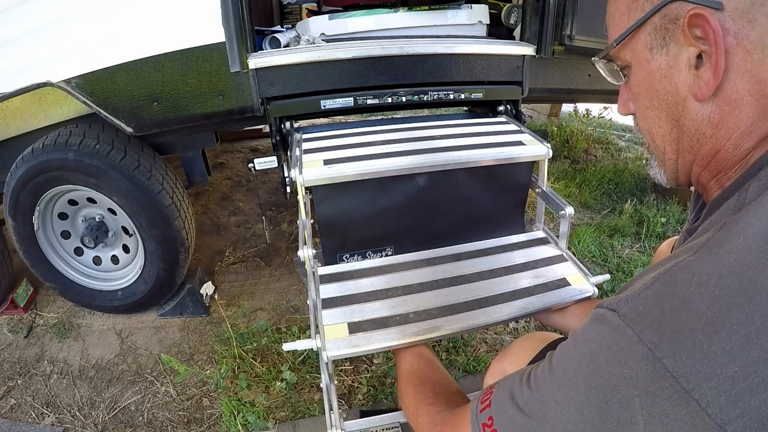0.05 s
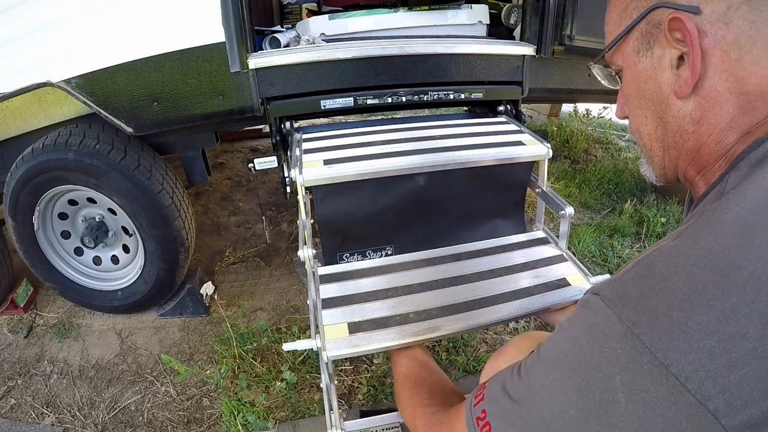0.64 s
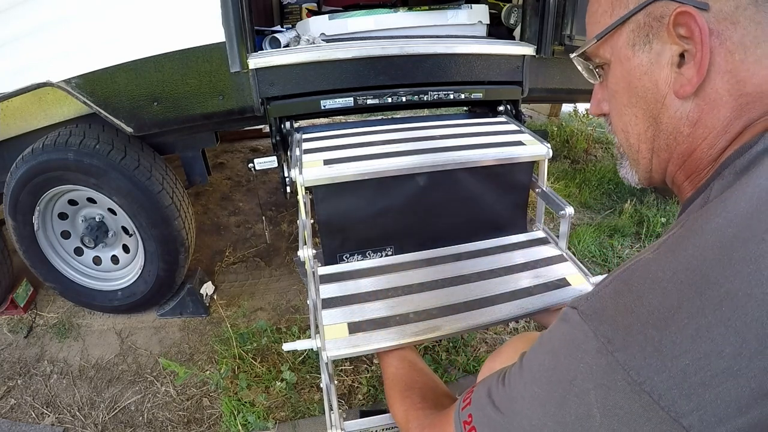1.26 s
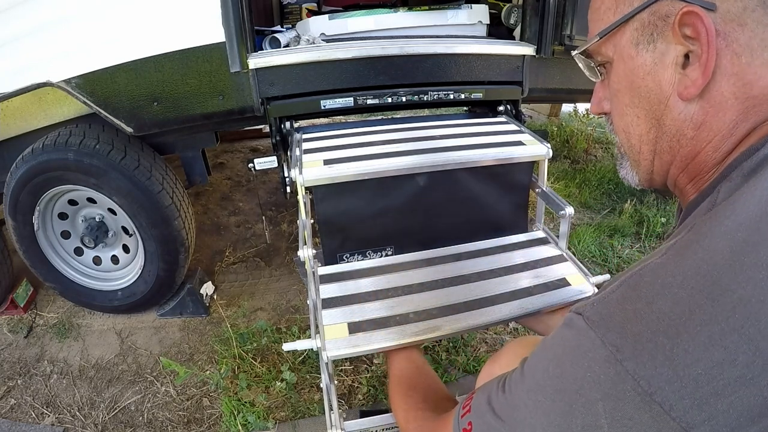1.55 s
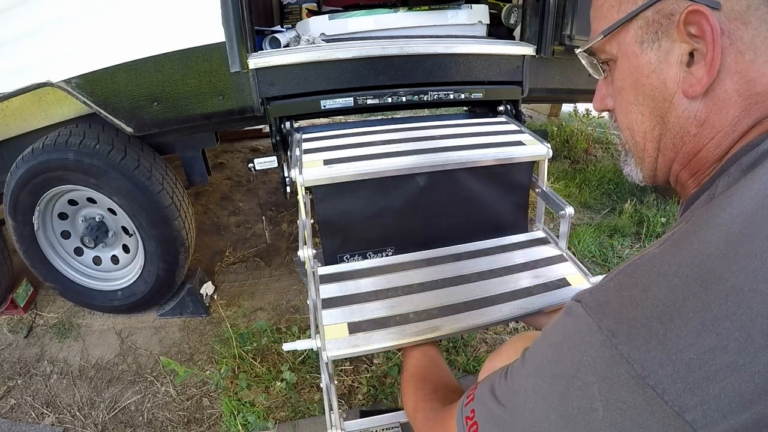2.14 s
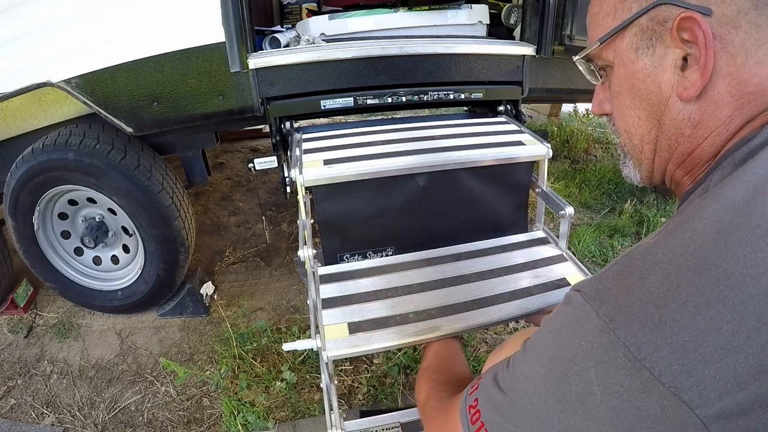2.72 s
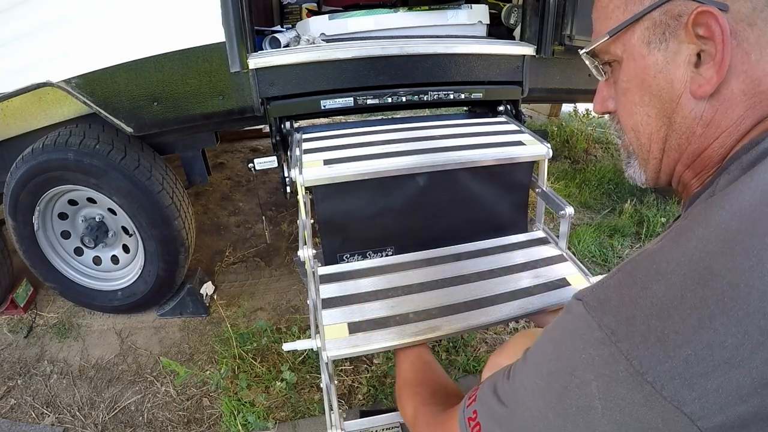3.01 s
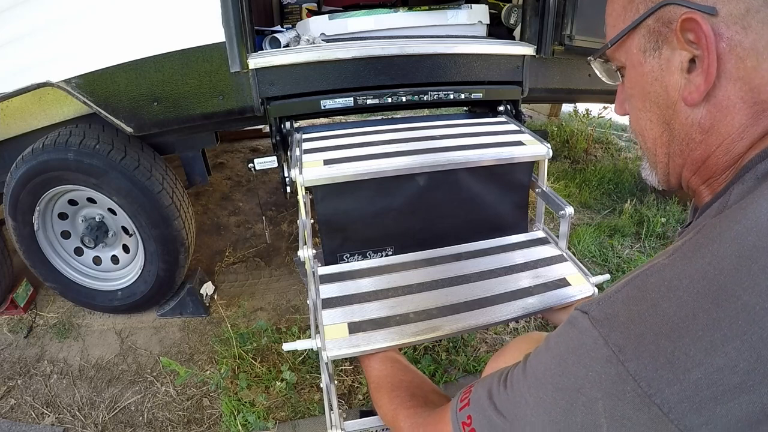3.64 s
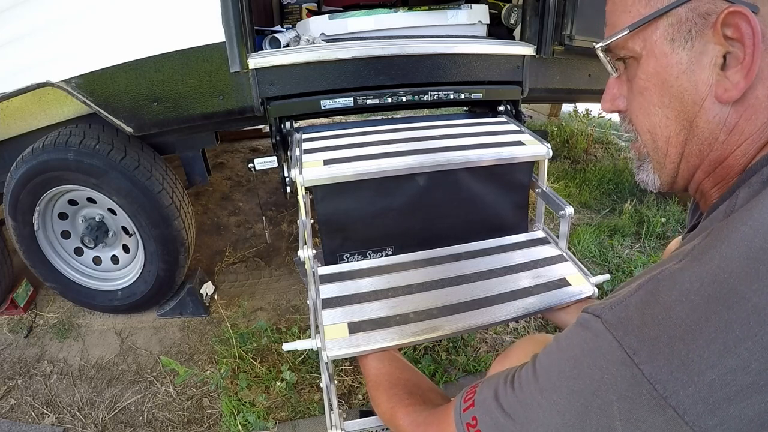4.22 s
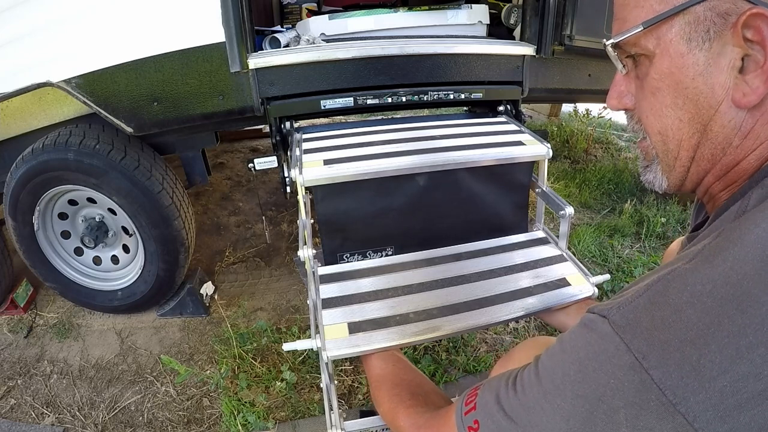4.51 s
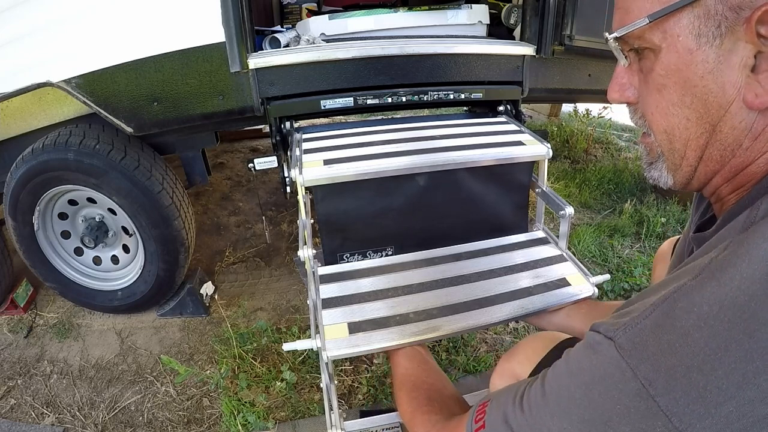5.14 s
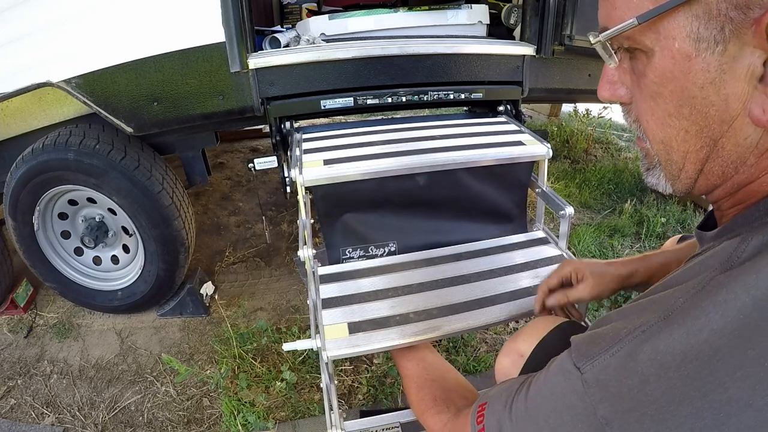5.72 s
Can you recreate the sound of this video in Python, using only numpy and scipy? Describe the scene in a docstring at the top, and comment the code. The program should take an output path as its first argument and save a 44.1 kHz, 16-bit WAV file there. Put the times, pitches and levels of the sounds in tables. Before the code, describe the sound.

Outdoors, hands press a hook-and-loop fabric panel onto a metal step close to the microphone. The fabric slides and rustles faintly, with soft finger taps, scuffs and tiny scratchy ticks. The step knocks once, lightly, about a second in. A low hum from a distant engine then swells, holds for a few seconds and drops back, over a soft rumble of air.

```python
"""Outdoors at an aluminium trailer step, hands press a hook-and-loop backed fabric panel into place. Stick-slip
friction sounds as fabric slides over the tread and fingers scuff the panel and scratch over the ribbed tread.
Impacts excite damped vibrations: fingers tap the taut panel, single hooks tick, the step knocks once. Behind
them the air hisses over a low rumble, and a far engine hums, swells and fades while its firing rate sinks."""
import sys
import numpy as np
from scipy import signal
from scipy.fft import rfft, irfft
from scipy.io import wavfile

SR = 44100
rng = np.random.default_rng(int(sys.argv[2]) if len(sys.argv) > 2 else 0)


def inscribe(sig):
    """Save sig as 16-bit PCM at rate SR to the path in sys.argv[1].

    A 1-D sig is mono; a 2-D sig holds one channel per row.
    Samples are clipped to [-1, 1] before scaling.
    """
    pcm = np.round(np.clip(np.atleast_2d(sig).T, -1, 1) * 32767)
    wavfile.write(sys.argv[1], SR, pcm.astype(np.int16))


N = 262836


def from_db(db):
    """Amplitude ratio: tenfold for every 20 dB."""
    return 10 ** (np.asarray(db) / 20)


def unit_rms(x):
    """Normalisation to unit mean power."""
    return x / np.sqrt(np.mean(x ** 2) + 1e-20)


def level_curve(rows):
    """Linear interpolation of a level over time, one value a sample."""
    return np.interp(np.arange(N) / SR, *np.transpose(rows))


def coloured(x, spectrum):
    """Spectral shaping along a logarithmic frequency axis; rms 1."""
    hz, db = np.transpose(spectrum)
    bins = np.maximum(np.fft.rfftfreq(N, 1 / SR), 1)
    gain = from_db(np.interp(np.log(bins), np.log(hz), db, left=-90, right=-90))
    return unit_rms(irfft(rfft(x) * gain, N))


def band(x, low_hz, high_hz, order=2):
    """Causal band-pass filtering."""
    return signal.sosfilt(signal.butter(order, [low_hz, high_hz], "band", fs=SR, output="sos"), x)


def noise(count, low_hz, high_hz, order=2):
    """Band-limited random noise; rms 1."""
    return unit_rms(band(rng.standard_normal(count), low_hz, high_hz, order))


def drift(rate_hz):
    """Random modulation: low-passed noise with a spread of 1."""
    count = 8192
    bins = np.fft.rfftfreq(count, N / SR / count)
    slow = unit_rms(irfft(rfft(rng.standard_normal(count)) / (1 + (bins / rate_hz) ** 4)))
    return np.interp(np.linspace(0, count - 1, N), np.arange(count), slow)


def resonance(x, hz, width_hz):
    """Driven damped oscillator with unit gain at its peak."""
    r = np.exp(-np.pi * width_hz / SR)
    feedback = [1, -2 * r * np.cos(2 * np.pi * hz / SR), r * r]
    return signal.lfilter(np.array([1, 0, -1]) * (1 - r * r) / 2, feedback, x)


def slips(per_s, spread_db):
    """Stick-slip friction as a random impulse train in which large slips are rare; rms 1."""
    chance = rng.random(N, dtype=np.float32) * SR / per_s
    at = np.flatnonzero(chance < 1)
    sizes = np.zeros(N)
    sizes[at] = from_db(spread_db * np.minimum(-np.log(chance[at] + 1e-9), 4))
    signs = 2 * rng.integers(0, 2, N, dtype=np.int8) - 1
    return unit_rms(sizes * signs)


def add(out, start_s, sound):
    """Superposition of a short sound on the output."""
    at = round(start_s * SR)
    out[at:at + len(sound)] += sound[:N - at]


def bell(peak_s, length_s, rise_share):
    """Amplitude envelope of one motion: a lopsided bell that reaches 1 at peak_s."""
    age = np.arange(N) / SR - peak_s
    near, out = np.abs(age) < 3 * length_s, np.zeros(N)
    width_s = length_s * np.where(age[near] < 0, rise_share, 1 - rise_share)
    out[near] = np.exp(-(age[near] / width_s) ** 2)
    return out


def strokes(rows, friction, rise_share, upper_ratio, upper_db):
    """Forced vibration: the friction of each stroke drives a resonance and a weaker one above it."""
    out = np.zeros(N)
    for peak_s, length_s, db, hz, width_hz in rows:
        envelope = bell(peak_s, length_s, rise_share)
        near = envelope > 1e-4
        grip = band(friction[near], 200, 2 * hz)  # a soft contact feeds little far above the resonance
        upper = from_db(upper_db) * resonance(grip, hz * upper_ratio, width_hz)
        out[near] += from_db(db) * unit_rms(resonance(grip, hz, width_hz) - upper) * envelope[near]
    return out


def contacts(rows, attack_s, crack_db, crack_t60_s, crack_band_hz):
    """Free vibration: each impulse leaves a damped sinusoid and a short crack of noise."""
    out, t = np.zeros(N), np.arange(SR // 6) / SR
    for start_s, db, hz, t60_s in rows:
        swing = np.sin(2 * np.pi * hz * t) * from_db(-60 * t / t60_s) * (1 - np.exp(-t / attack_s))
        crack = noise(len(t), *crack_band_hz) * from_db(crack_db - 60 * t / crack_t60_s)
        add(out, start_s, from_db(db) * (swing / np.abs(swing).max() + crack))
    return out


# spectrum of still air: frequency_hz, relative_db
AIR_SPECTRUM = [(20, -13.5), (54, -18.5), (110, -10), (135, -20.5), (175, -12.5), (270, -19), (335, -21),
                (430, -22.5), (700, -22.5), (1000, -27), (1720, -40), (3600, -58), (4400, -44.5),
                (5800, -47), (7500, -54), (15500, -51.5)]
# spectrum of the low rumble, its peak near 27 Hz a slow beat of the far engine: frequency_hz, relative_db
RUMBLE_SPECTRUM = [(14, -5), (27, 4), (55, -1), (80, -4), (140, -19), (220, -29.5), (340, -23.5),
                   (450, -36)]
# slow swell of the rumble: time_s, level_db
RUMBLE_LEVELS = [(0, -55), (.8, -58.5), (1.3, -50.5), (2.8, -49), (4.3, -51), (4.65, -58), (5.96, -56.5)]
# gusts riding on the rumble: peak_s, level_db
RUMBLE_GUSTS = [(1.5, -51.5), (2.42, -47), (4.2, -46), (4.83, -43.5), (5.17, -41)]


def outdoor_air(air_db=-69, gust_s=0.067):
    """Broadband noise: steady air lies over a rumble whose amplitude swells and gusts."""
    air = coloured(rng.standard_normal(N), AIR_SPECTRUM)
    air = band(air, 180, 18000) / np.std(band(air, 300, 15000))
    gusts = sum(from_db(db) * bell(peak_s, gust_s, rise_share=0.42) for peak_s, db in RUMBLE_GUSTS)
    rumble = coloured(rng.standard_normal(N), RUMBLE_SPECTRUM)
    return from_db(air_db) * air + (from_db(level_curve(RUMBLE_LEVELS)) + gusts) * rumble


# swell and fade of the firing tone: time_s, level_db
FIRING_LEVELS = [(0, -53.5), (.57, -63), (.65, -43), (.72, -56), (.82, -56), (.88, -44.5), (1.04, -41.5),
                 (1.3, -50), (1.62, -35), (2.15, -30.5), (4.22, -30), (4.55, -42.5), (4.85, -40.5),
                 (5.96, -45)]
# weak engine partials: firing_rate_multiple, relative_db
ENGINE_PARTIALS = [(1.16, -31), (1.30, -30), (1.42, -32.5), (1.562, -37.5), (1.846, -33.5), (2.0, -34),
                   (2.255, -36.5), (2.691, -42.5), (3.17, -43)]


def far_engine(start_hz=109.57, settled_hz=99.5, settle_s=4.2, partials_follow=0.73, blur_db=-59):
    """Distance leaves mostly the firing tone; multipath scattering blurs it and makes partials waver."""
    firing_hz = settled_hz + (start_hz - settled_hz) * np.exp(-np.arange(N) / SR / settle_s)
    phase = 2 * np.pi * np.cumsum(firing_hz) / SR
    db = level_curve(FIRING_LEVELS)
    tone = from_db(db) * np.sin(phase) * (1 + .06 * drift(9))
    # the partials follow only a share of the firing tone's rise and fall
    partials_gain = from_db(db.max() + partials_follow * (db - db.max()))
    for multiple, relative_db in ENGINE_PARTIALS:
        amplitude = partials_gain * from_db(relative_db) * (1 + 0.53 * drift(7.7))
        tone += amplitude * np.sin(multiple * phase + 0.21 * drift(1.8))
    return np.sqrt(2) * tone + from_db(blur_db) * noise(N, 92.4, 117.8, order=3)


# fabric slides over the tread: peak_s, length_s, level_db, relative_treble_db
FABRIC_SLIDES = [(.01, 0.061, -62.5, 0.5), (0.297, 0.24, -71.5, 1.5), (0.558, 0.063, -63, -1.5),
                 (0.95, 0.15, -69, 3.5), (1.086, 0.097, -63.5, 3.5), (1.257, 0.033, -53.5, -5.5),
                 (1.302, 0.12, -58.5, -8.5), (1.573, 0.19, -58, -2), (1.816, 0.19, -66, -5),
                 (1.926, 0.053, -57, -9), (2.063, 0.16, -65.5, -5), (2.392, 0.14, -64.5, -7),
                 (2.638, 0.047, -53.5, -5), (2.885, 0.18, -65.5, 3.5), (3.126, 0.38, -54.5, -4.5),
                 (3.592, 0.12, -60.5, -4.5), (3.806, .06, -61, -11), (4.429, 0.04, -68.5, 4.5),
                 (4.672, 0.11, -64, -2), (4.787, 0.069, -63, -8), (5.06, 0.27, -63, -10),
                 (5.272, .07, -59, -10), (5.41, 0.084, -65.5, -2.5), (5.625, 0.11, -63, 1)]


def fabric_motion(rustle_db=-72.5, rustle_treble_db=-1.5, swing_db=1.5):
    """Incoherent sources add in power: slides and resting rustle set the gains of body and treble."""
    body = from_db(rustle_db + swing_db * drift(5.4)) ** 2
    treble = body * from_db(rustle_treble_db) ** 2
    for peak_s, length_s, db, treble_db in FABRIC_SLIDES:
        power = (from_db(db) * bell(peak_s, length_s, rise_share=0.59)) ** 2
        body += power
        treble += power * from_db(treble_db) ** 2
    return np.sqrt(body), np.sqrt(treble)


# spectra of the sliding fabric's body and treble: frequency_hz, relative_db
FABRIC_BODY = [(400, -1), (800, 1), (1400, -2), (2100, -3), (2800, -2), (3750, 0.5), (4350, -14),
               (5200, -19.5)]
FABRIC_TREBLE = [(4200, -27.5), (4900, -6), (5700, 3), (7000, -7), (8200, -6.5), (9200, -10), (11000, -5.5),
                 (12200, -14.5), (13300, -6), (15500, -20)]


def sliding_fabric(treble_db=-7.0, catch_db=1.75, crackle_db=-11, width_hz=420):
    """Sliding friction: the weave catches and crackles; tread resonances come and go as it moves."""
    body_gain, treble_gain = fabric_motion()
    weave = np.zeros(N)
    for hz in np.linspace(700, 15000, 40):
        friction = slips(per_s=1500, spread_db=3.0)
        ring = resonance(resonance(friction, hz, width_hz), hz, width_hz)
        weave += ring * from_db(2.8 * drift(5))
    weave *= from_db(catch_db * drift(20))
    crackle = from_db(crackle_db) * slips(per_s=93, spread_db=2.5)
    sheen = from_db(treble_db) * coloured(unit_rms(weave) + crackle, FABRIC_TREBLE)
    return body_gain * coloured(weave, FABRIC_BODY) + treble_gain * sheen


# fingertips scratch over the ribbed tread: peak_s, length_s, level_db, pitch_hz, width_hz
TREAD_SCRATCHES = [(.492, 0.053, -60, 5460, 160), (.495, .055, -62, 3260, 400),
                   (1.5, 0.095, -62.5, 2300, 600), (1.59, 0.089, -65, 5600, 200),
                   (1.836, 0.031, -56, 3036, 68.5), (1.826, .034, -65.5, 5600, 89),
                   (2.385, 0.098, -62.5, 3540, 287), (2.665, 0.075, -57, 2400, 684),
                   (3.08, 0.19, -62, 5400, 400), (4.122, 0.021, -70, 5420, 198.6),
                   (4.2, 0.045, -72.5, 6100, 254), (4.736, .014, -63.5, 5730, 180),
                   (5.54, 0.12, -64.5, 2250, 200), (5.635, .042, -60.5, 5660, 400),
                   (5.746, 0.021, -65.5, 5650, 150), (5.87, .06, -73.5, 5800, 300)]


def tread_scratches():
    """Repeated plucking: fingertips drag over the tread's ribs one after another and ring them in narrow
    resonances."""
    friction = band(slips(per_s=1200, spread_db=5.0), 1900, 17000)
    return strokes(TREAD_SCRATCHES, friction, rise_share=.48, upper_ratio=3.2, upper_db=-21)


# single hooks let go: start_s, level_db, pitch_hz
HOOK_TICKS = [(0.475, -49, 5670), (1.567, -45, 5730), (2.610, -44.5, 3160), (2.6667, -43, 2600),
              (3.8015, -47, 3640), (3.863, -43, 3450), (4.1135, -52, 5400), (5.737, -52, 5500)]


def hook_ticks(t60_s=0.017):
    """Elastic release: a hook lets go and rings briefly at a high pitch."""
    rows = [(*row, t60_s) for row in HOOK_TICKS]
    return contacts(rows, attack_s=0.00013, crack_db=-12, crack_t60_s=0.011, crack_band_hz=(2200, 13000))


# fingers scuff the panel: peak_s, length_s, level_db, pitch_hz
FINGER_SCUFFS = [(0.127, 0.075, -58, 736), (0.26, 0.69, -72.5, 730), (0.501, 0.052, -58, 664),
                 (0.553, 0.048, -52, 880), (0.911, 0.042, -61, 700), (1.26, 0.086, -48.5, 580),
                 (1.315, .09, -54, 820), (1.752, 0.065, -55.5, 990), (1.92, .033, -52, 895),
                 (1.962, 0.033, -51, 960), (2.653, 0.11, -54.5, 820), (2.786, 0.042, -49, 1010),
                 (2.846, 0.12, -62.5, 930), (3.023, 0.092, -55, 890), (3.126, 0.26, -56.5, 1330),
                 (4.768, 0.076, -61.5, 1360), (4.854, 0.082, -58.5, 820), (5.15, 0.07, -62, 696),
                 (5.258, 0.064, -51.5, 890), (5.41, 0.14, -63.5, 785), (5.527, 0.068, -54.5, 710),
                 (5.615, 0.085, -60, 640)]


def finger_scuffs(judder_db=2.0, width_hz=430):
    """Stick-slip of skin drives the broad, dull resonances of the taut panel."""
    friction = band(slips(per_s=2800, spread_db=1.5), 230, 1700) * from_db(judder_db * drift(98))
    rows = [(*row, width_hz) for row in FINGER_SCUFFS]
    return strokes(rows, friction, rise_share=0.36, upper_ratio=1.55, upper_db=-13)


# the two close impacts of one knock: start_s, level_db
STEP_IMPACTS = [(1.2431, -43.5), (1.248, -35.5)]
# modes of the step, damped by the hands: pitch_hz, relative_db, t60_s
STEP_MODES = [(207, 4, 0.06), (327, 4, 0.088), (404, 0.5, 0.065), (664, 4.5, 0.021), (1090, 15, 0.0056),
              (1400, -11, 0.0051), (1850, -7, 0.018), (2360, -18, 0.14), (2770, -33, 0.11),
              (2929, -23.5, .10), (3640, -11.5, .07), (4020, -22, 0.11), (5960, -28, 0.15)]


def step_knock(crack_db=-13, crack_t60_s=0.015, thud_db=-7, thud_t60_s=.075):
    """Modal vibration: the step shifts in its hinge, the impacts ring its modes and the frame thuds."""
    out, t = np.zeros(N), np.arange(SR // 3) / SR
    ring = sum((-1) ** k * from_db(db - 60 * t / t60_s) * np.sin(2 * np.pi * hz * t)
               for k, (hz, db, t60_s) in enumerate(STEP_MODES))
    for start_s, db in STEP_IMPACTS:
        crack = noise(len(t), 180, 6600) * from_db(crack_db - 60 * t / crack_t60_s)
        thud = noise(len(t), 100, 450) * from_db(thud_db - 60 * t / thud_t60_s)
        add(out, start_s, from_db(db) * (ring + crack + thud))
    return out


# fingers tap the panel: start_s, level_db, pitch_hz, t60_s
FINGER_TAPS = [(.119, -40, 830, 0.018), (.279, -48.5, 740, 0.007), (.555, -38.5, 1060, 0.0048),
               (.776, -52.5, 930, 0.026), (.924, -50.5, 600, 0.031), (1.277, -39, 750, 0.0067),
               (1.911, -41.5, 750, 0.01), (1.9295, -28.5, 674, 0.012), (1.9655, -39, 607, .024),
               (2.641, -32.5, 633, .025), (2.676, -36.5, 915, .015), (2.780, -41, 1252, 0.072),
               (2.786, -37, 750, 0.054), (3.173, -40, 1310, 0.0075), (4.233, -48, 800, 0.0053),
               (4.559, -52.5, 745, 0.011), (4.8528, -34.5, 875, 0.0064), (5.160, -43, 770, 0.0091),
               (5.237, -41.5, 665, 0.024), (5.2475, -38.5, 705, .007)]


def finger_taps():
    """Impact excitation: a soft fingertip sets the taut panel into a quickly damped vibration."""
    return contacts(FINGER_TAPS, attack_s=0.0014, crack_db=-16, crack_t60_s=0.03,
                    crack_band_hz=(850, 1760))


def scene():
    """Superposition of close handling, far engine and outdoor air in one channel."""
    contact = from_db(-1) * finger_taps() + from_db(-6) * hook_ticks()
    fabric = from_db(0.27) * sliding_fabric()
    rubbing = from_db(1.07) * finger_scuffs() + from_db(-0.1) * tread_scratches()
    hands = contact + fabric + rubbing + step_knock()
    return (far_engine() + outdoor_air() + hands)[None]


def record(dry, cutoff_hz=15400):
    """Band limiting: a steep low-pass removes the highest treble."""
    return signal.sosfilt(signal.ellip(10, .1, 80, cutoff_hz, fs=SR, output="sos"), dry)


dry = scene()
out = record(dry)
inscribe(out)
```